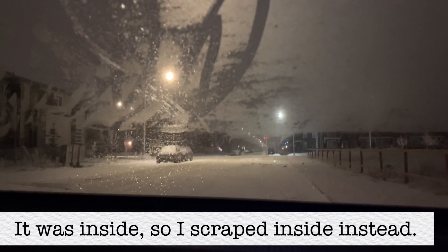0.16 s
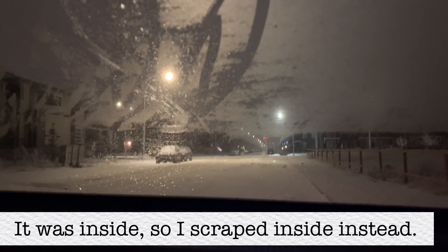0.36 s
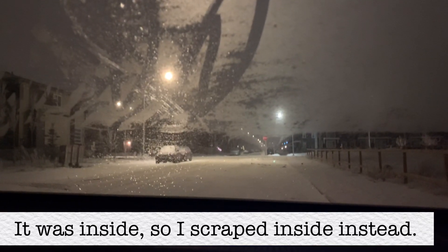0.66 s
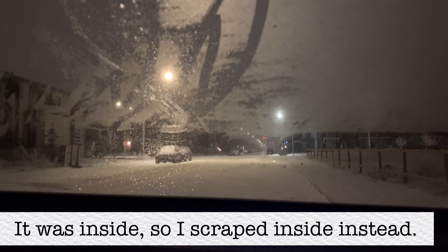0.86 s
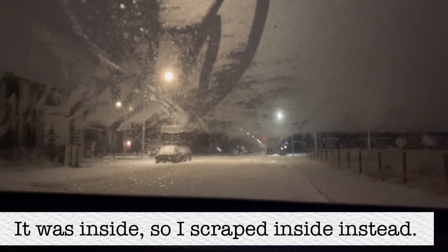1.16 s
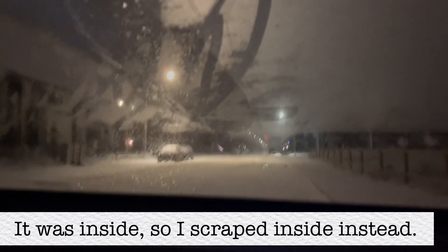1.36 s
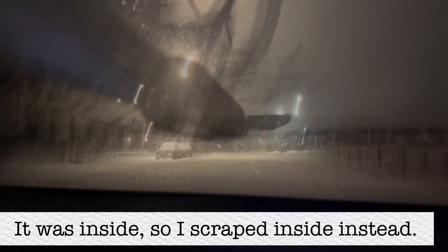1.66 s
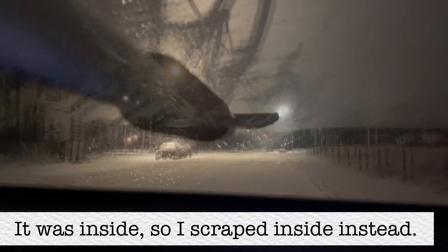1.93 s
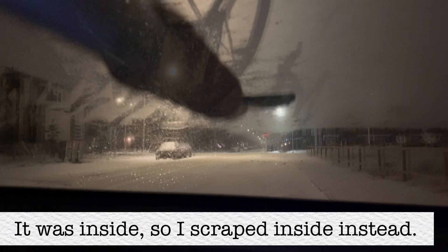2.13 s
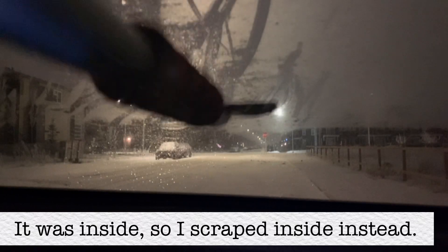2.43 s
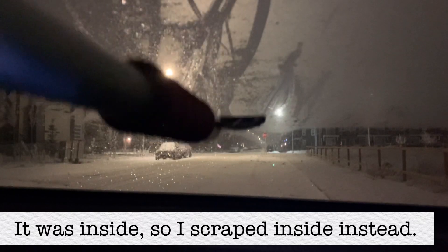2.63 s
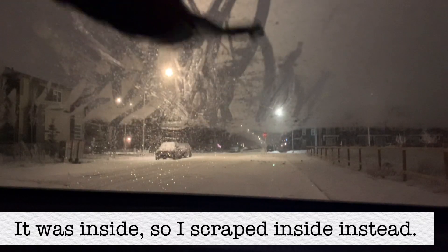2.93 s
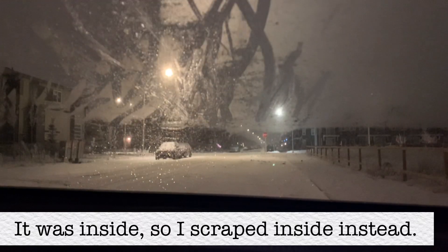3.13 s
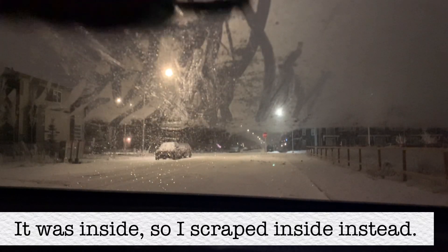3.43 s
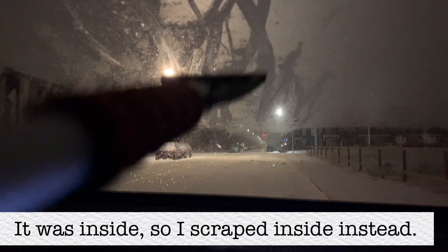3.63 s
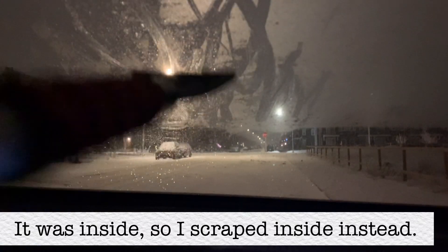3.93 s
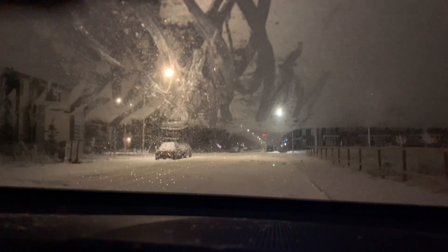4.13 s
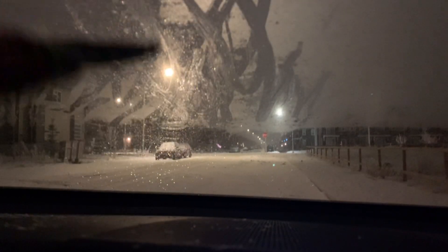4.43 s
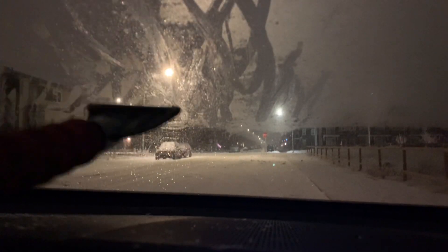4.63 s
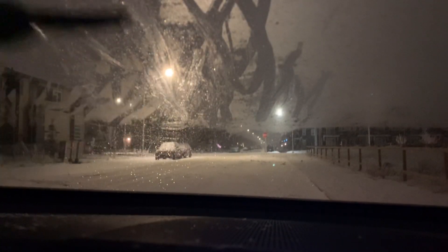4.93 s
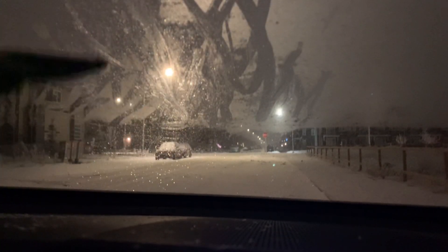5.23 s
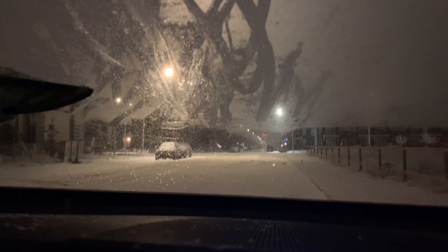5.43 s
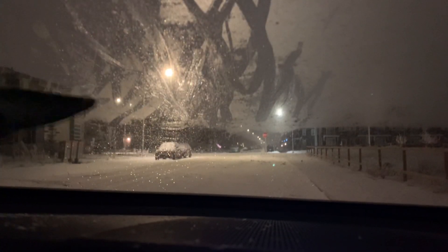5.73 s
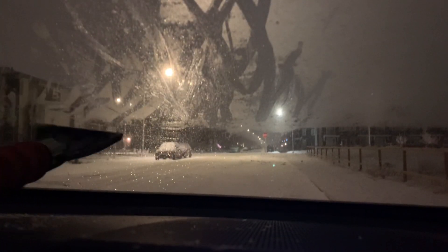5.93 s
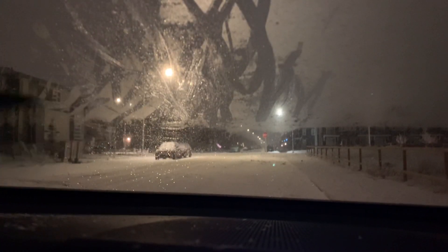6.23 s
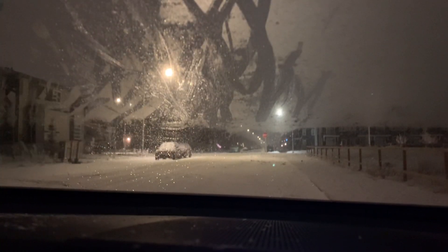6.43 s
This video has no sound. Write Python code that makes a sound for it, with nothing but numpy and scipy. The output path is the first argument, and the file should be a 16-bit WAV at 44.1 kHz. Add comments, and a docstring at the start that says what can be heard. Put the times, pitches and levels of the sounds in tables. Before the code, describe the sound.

Inside a parked car, a heater blower roars low and steady with a faint wavering drone. After about a second, a plastic scraper touches the windscreen, brushing softly, then rasping frost away in crisp, gritty, uneven strokes with brief squeaks. The scraping later thins into shorter, lighter scratches, and the handle knocks the trim once with a hard clack and dull thud. A phone close by picks it up in stereo.

```python
"""A heater blower roars inside a parked car over a low drone: shaped noise and a wavering low tone.
Then a plastic blade rasps frost off the windscreen in uneven strokes: bursting noise rings its resonances.
The edge ticks on the glass in short noise cracks, and once the handle knocks the trim, which cracks, rings and thuds.
A phone with two microphone ports lies near; in the top treble both channels carry mostly one sound."""
import sys
import numpy as np
from scipy import signal
from scipy.fft import rfft, irfft, next_fast_len
from scipy.io import wavfile
from scipy.ndimage import uniform_filter1d, map_coordinates

SR = 44100
rng = np.random.default_rng(int(sys.argv[2]) if len(sys.argv) > 2 else 0)


def master_out(mix):
    """Clip the mix to full scale and print it as 16-bit PCM to the path in sys.argv[1]."""
    frames = np.transpose(np.atleast_2d(mix))
    ceiling = np.clip(frames, -1, 1)
    pcm = np.round(ceiling * 32767).astype(np.int16)
    wavfile.write(sys.argv[1], SR, pcm)


N = 289737  # length in samples
M = next_fast_len(N)  # length of the Fourier transforms
T = np.arange(N) / SR  # time, s
F = np.arange(M // 2 + 1) * SR / M  # frequency, Hz
SIGN = np.array([[1], [-1]])  # left port plus, right port minus

# strokes of the blade, from bite to lift:
# (start [s], end [s], rasp drive at start [dB], at end [dB], blade body relative to rasp [dB])
STROKE_LIST = [ (1.162, 1.45, -49, -69, 7), (1.442, 1.503, -50, -53, 2), (1.522, 1.74, -50, -65, 4),
               (1.773, 1.8, -50, -51.5, 10.5), (1.98, 2.055, -46.5, -45, 3.5),
               (2.078, 2.19, -35.5, -35, -1.5), (2.244, 2.25, -42, -45, 6), (2.27, 2.7, -59, -57, 8),
               (2.39, 2.53, -42.5, -37, 3.5), (2.62, 2.692, -44, -37.5, -3), (2.73, 2.914, -34, -27, -2.5),
               (2.927, 3.015, -30, -30, -1.5), (3.055, 3.22, -25.5, -33.5, -2.5),
               (3.25, 3.275, -45.5, -39, 3), (3.288, 3.354, -32, -34, 0.5), (3.412, 3.46, -31, -31, 0.5),
               (3.517, 3.64, -34.5, -28, -1), (3.617, 3.77, -32.5, -39, 1),
               (3.849, 3.892, -35, -35.5, -1.5), (3.954, 4.017, -31, -31.5, 3),
               (4.067, 4.173, -28, -29.5, -4), (4.275, 4.41, -37.5, -39, 0.5),
               (4.414, 4.485, -27.5, -31.5, -1), (4.524, 4.614, -31, -41, -0.5),
               (4.762, 4.77, -35.5, -36.5, -3), (4.797, 4.808, -38, -37.5, -5), (4.815, 4.845, -49, -51, 0),
               (4.86, 4.96, -36.5, -33.5, -0.5), (5.093, 5.3, -42.5, -57, 4), (5.158, 5.21, -32, -38.5, 1),
               (5.24, 5.306, -27.5, -37, 0), (5.283, 5.447, -40, -40, 3), (5.46, 5.52, -49, -57, 2),
               (5.528, 5.575, -45, -47.5, 3.5), (5.59, 5.64, -55, -59, 6), (5.652, 5.75, -48.5, -47, 3),
               (5.762, 5.8, -38, -37, -3), (5.815, 5.853, -29, -38, -7), (5.868, 5.924, -33, -43, -3.5),
               (5.95, 6.13, -57, -64, 5), (6.086, 6.089, -54, -53, 10), (6.154, 6.222, -41.5, -36, -3.5),
               (6.289, 6.325, -32.5, -46.5, -0.5), (6.33, 6.395, -50, -57, 2), (6.409, 6.412, -39, -47, 3),
               (6.448, 6.63, -46, -37, 0.5)]
# the blade hops off (minus) or bites in (plus): (time [s], level change [dB], half-length [s])
JOLT_LIST = [(3.226, -13, 0.015), (3.389, 16, .006), (3.401, -7, 0.0046), (3.898, -7, 0.005),
             (4.18, -5, 0.0077), (4.2, 7, 0.0049), (4.37, -9, 0.0046), (4.716, 22, .006), (4.785, -4, .005),
             (4.848, -8, .005), (4.912, -12, 0.005), (4.945, -13, 0.0043), (5.203, -2, 0.005),
             (5.317, -4, 0.0047), (5.81, -9.5, .005), (6.266, -17, 0.0086), (6.281, 3, 0.0029),
             (6.458, 7.5, .01), (6.478, -10, .006), (6.5, 8, 0.011)]
# overall tone colour of the rasp: (frequency [Hz], relative level [dB])
RASP_COLOUR = [(1000, -2), (1900, -5), (2600, -1), (3500, -2.5), (4600, -6), (5200, -6), (6300, -7),
               (7500, -9), (10000, -4.5), (13000, -0.5), (16000, -3)]
# resonances of blade and glass, before their levels wander:
# (frequency [Hz], width [Hz], level over rasp [dB])
BLADE_RINGS = [(2356, 41, 1.5), (2610, 42, -1), (3080, 72, -5), (3400, 120, -9.5), (3940, 190, -1.5),
               (4460, 160, 1.5), (4880, 120, -3), (5760, 120, -19), (7300, 370, -4), (8080, 120, 4.5),
               (9670, 440, 0), (10450, 350, -2), (11370, 280, -6.5), (12200, 230, -21), (13800, 320, -22)]
# moments when a resonance sings out: (time [s], frequency [Hz], gain on the rasp drive [dB], half-length [s])
SING_LIST = [(2.12, 3830, 8, 0.041), (2.822, 3420, 11, .045), (2.856, 2550, 9, .035),
             (2.87, 3000, 3, 0.027), (2.857, 5000, 6, 0.033), (2.97, 3020, 9.5, 0.042),
             (2.975, 3700, 7, 0.03), (3.01, 2330, 11, 0.016), (3.028, 3650, 17, 0.0086),
             (3.06, 3950, 6, 0.022), (3.07, 3470, 7, .022), (3.074, 9850, 15, 0.041),
             (3.114, 2940, 10, 0.027), (3.114, 5130, 10, 0.016), (3.145, 3400, 11, 0.019),
             (3.303, 3380, 10, 0.016), (3.323, 3040, 6, .03), (3.32, 9650, 9, 0.034), (3.39, 4060, 13, .01),
             (3.437, 4120, 9, .032), (3.44, 2370, 9, 0.04), (3.444, 3040, 9, .035),
             (3.524, 2400, 10, 0.027), (3.566, 3060, 12, 0.031), (3.626, 4570, 6, 0.067),
             (3.98, 2380, -1, 0.032), (4.085, 3240, 11.5, 0.024), (4.138, 4000, 11, 0.025),
             (4.15, 3400, 11, .03), (4.42, 3230, 8, 0.019), (4.454, 4400, 5, 0.026),
             (4.446, 2390, 2, 0.027), (4.457, 3680, 10, 0.02), (4.564, 5800, 3, 0.014),
             (4.768, 3700, 9, .006), (4.875, 4100, 8, .012), (4.882, 3230, 13, .012),
             (4.928, 4500, 15, .012), (4.95, 4370, 13, 0.0076), (4.936, 2550, -4, 0.017),
             (5.1, 4370, 15, .008), (5.16, 3950, 5, 0.0073), (5.165, 4700, 10, 0.011),
             (5.23, 4500, 6, 0.016), (5.25, 2540, 7, 0.038), (5.257, 4100, 5, .015), (5.268, 4490, 8, .01),
             (5.277, 3200, 10, 0.023)]
# broad bands of the dry tick: (from [Hz], to [Hz])
TICK_BANDS = [(3000, 4800), (5000, 7400), (9400, 12800), (14300, 15600)]
# blade edge ticking on glass; near 5.83 s, the hard cracks of the knock; before the ports are mixed:
# (time [s], then the peak in each tick band, low to high [dB])
TICK_LIST = [(1.097, -36, -37, -37, -40), (1.4255, -38, -38, -32, -35), (1.4408, -20, -22, -29, -34),
             (1.4425, -23, -33, -35, -38), (1.5036, -24, -24, -24, -17), (2.2377, -32, -37, -37, -37),
             (6.2795, -33, -38, -32, -40), (5.8232, -21, -34, -27, -36), (5.8275, -27, -28, -18, -34),
             (5.829, -23, -23, -24, -34), (5.8315, -25, -24, -23, -31)]
# blows of the handle on the trim, with a bounce: (time [s], strength [dB], left minus right [dB])
KNOCK_LIST = [(5.8232, -25, 5), (5.8255, -24, 4), (5.8277, -18.5, 2), (5.8312, -27, 4), (5.8335, -27, 2),
              (5.839, -34, 0)]
# ringing of the trim: (frequency [Hz], typical level [dB], time to fall 60 dB [s], left phase lead [turns])
TRIM_RINGS = [(414, -3, .032, .2), (662, 4, .03, .12), (776, 2, .03, .15), (890, -5, .026, .35),
              (1130, -2, .015, .45), (1250, 0, .022, .45), (1410, -4, .022, .3), (1730, 2.5, .02, .15),
              (1970, -5, .016, .25), (2300, -4, .016, .45), (2620, -7, .016, .4), (3280, -9, .018, .2),
              (4640, -11, .012, .15)]
# low thumps around the knock: (time [s], frequency [Hz], peak [dB], half-length [s])
THUD_LIST = [(5.811, 86, -22, 0.015), (5.838, 409, -28, 0.011), (5.841, 199.2, -16.5, 0.0081),
             (5.855, 94, -19.5, 0.021)]
# loudness of the roar before it wavers: (time [s], level [dB])
ROAR_LEVEL = [(0, -27.5), (1.07, -27.5), (1.12, -24), (2.55, -25), (2.68, -27), (4.45, -28), (4.9, -27),
              (5.5, -27.5), (6.57, -27.5)]
# tone colour of the blower air: (frequency [Hz], relative level per Hz [dB])
BLOWER_COLOUR = [(20, -29), (39, -10), (87, -1.5), (129, -7.5), (157, -10), (191, -4), (226, -7.5),
                 (296, -7.5), (428, -12), (790, -15), (961, -22), (1230, -25), (2060, -31.5), (2900, -33),
                 (3300, -36.5), (3950, -37), (4250, -43.5), (5000, -43), (5700, -47), (6350, -45),
                 (7100, -50.5), (8000, -52), (10800, -56), (12000, -51.5), (16000, -62)]
# cabin and duct resonances in the roar: (frequency [Hz], width [Hz], boost [dB])
CABIN_RESONANCES = [(82, 13, 0.5), (116.6, 18, 3), (198, 12, 0.5), (280, 19, 3), (870, 180, 0.5),
                    (1344, 320, 6), (1800, 37, -3.5)]
# how alike the roar is at the two ports: (frequency [Hz], likeness [-1 to 1])
PORT_LIKENESS = [(30, 0.21), (60, 0.92), (290, 0.85), (640, 0.57), (1400, 0.16), (2200, -0.14),
                 (3500, 0.043)]
# balance of the roar: (frequency [Hz], left minus right [dB])
PORT_BALANCE = [(60, -2), (130, -1), (380, 1.5), (1300, 0.2), (2400, 2), (5500, -3), (8000, -5.5)]
# low cabin drone near 57 Hz, swelling and fading, before its level wavers: (time [s], level [dB])
DRONE_LEVEL = [(0.0, -42.5), (0.88, -35), (1.1, -44), (1.22, -25), (1.37, -41), (1.52, -28.5), (1.9, -43),
               (2.12, -27.5), (2.4, -43), (2.49, -26), (2.96, -54), (3.16, -36), (3.3, -46), (4.1, -44),
               (4.24, -30), (4.37, -54.5), (4.46, -39), (6.57, -38.5)]

BITE_DB_PER_S, LIFT_DB_PER_S = 746, 517  # how fast the rasp comes in and dies away
DULLER_PER_DB = 0.1742  # body gained over rasp, in dB, for each dB that the blade eases off
REST_FROM_S, REST_DB, REST_BODY_DB = 1.1, -66, -4  # faint brushing between strokes
BODY_TOP_HZ = 6340  # the body level matters less and less above this
SING_WIDTH_HZ, SING_ALIKE = 81, 0.24  # alike: shared part of the singing at the two ports, 0 to 1
SQUEAKS_PER_S, SQUEAK_DB, SQUEAK_SPREAD_DB, SQUEAK_S = 200, -4, 0.5, 0.012  # chance catches
SNAP_S, ANSWER_S = .0009, .004  # fade times of a tick and its answer
ANSWER_DB, FIRST_DB = -14, 14  # answer and first click, before scaling in each band
CABIN_T60_S, CABIN_DB = .045, -5  # echoes of the knock: time to fall 60 dB, level
SURGE_DB = 1.16  # each octave of the roar surges on its own
DRONE_HZ = 57.36  # middle pitch of the drone
ONE_SOUND_HZ, LEFT_LATE_S, LEFT_TURN = 7300, .000204, .25  # crossover, lag, fixed phase lead in turns
TOP_HZ = 15700  # end of the treble


def undb(db):
    """Turn decibels into gain."""
    return 10 ** (np.asarray(db) / 20)


def unit(x):
    """Scale to an rms of 1."""
    return x / np.sqrt(np.mean(x ** 2))


def over_hz(table):
    """Read a (Hz, value) table on a log-frequency axis."""
    hz, value = np.transpose(table)
    return np.interp(np.log(F + 1), np.log(hz), value)


def walk(rate):
    """Wander smoothly: random levels held for 1 / rate s, then smoothed twice; spread near 1."""
    k = int(SR / rate)
    steps = np.repeat(rng.standard_normal(N // k + 1), k)
    return 1.223 * uniform_filter1d(uniform_filter1d(steps, k), k)[:N]


def scraping():
    """Ice crystals of unequal size burst densely, in catches and slips, and drive the blade."""
    rasp_db, body_db = pressure()
    # each crystal size is held for 8 samples
    size = np.repeat(rng.exponential(size=(2, N // 8 + 1)), 8, axis=1)[:, :N]
    crystals = rng.standard_normal((2, N)) * undb(2.2 * size)
    drive = unit(crystals) * undb(rasp_db + 0.6 * walk(60) + 1.5 * walk(300))
    left, other = sung(drive)
    right = np.sqrt(SING_ALIKE) * left + np.sqrt(1 - SING_ALIKE) * other
    return travel(blade(drive, body_db)) + np.array([left, right])


def pressure():
    """Each stroke bites, slides from its first level to its last and lifts; the strongest one is heard."""
    rasp_db = np.where(T > REST_FROM_S, REST_DB, -90.)
    body_db = np.full(N, 1. * REST_BODY_DB)
    for start, end, start_db, end_db, stroke_body_db in STROKE_LIST:
        eased_db = BITE_DB_PER_S * np.maximum(start - T, 0) + LIFT_DB_PER_S * np.maximum(T - end, 0)
        db = np.interp(T, [start, end], [start_db, end_db]) - eased_db
        body_db = np.where(db > rasp_db, stroke_body_db + DULLER_PER_DB * eased_db, body_db)
        rasp_db = np.maximum(rasp_db, db)
    jolt_db = sum(db * np.exp(-((T - at) / length) ** 2) for at, db, length in JOLT_LIST)
    return rasp_db + jolt_db, uniform_filter1d(body_db, size=400)


def blade(drive, body_db):
    """Frost drives the blade; broad regions and narrow resonances wander in level as angle and pressure shift."""
    colour = undb(over_hz(RASP_COLOUR))
    sound = rfft(drive, M) * colour / np.sqrt(np.mean(colour ** 2))
    parts = []
    for hz in 1000 * 2 ** np.arange(0, 4.5, .5):  # half-octave steps
        region = np.clip(1 - 2 * abs(np.log2((F + 1) / hz)), 0, 1)
        parts.append((hz, region, 0.6 * walk(25)))
    for hz, width, db in BLADE_RINGS:
        ring = 1 / (1 + (2 * (F - hz) / width) ** 2)
        parts.append((hz, ring, db + 1.5 * np.tanh(walk(15))))
    out = 0
    for hz, shape, db in parts:
        tilt_db = body_db / (1 + (hz / BODY_TOP_HZ) ** 6)
        out = out + undb(db + tilt_db) * irfft(sound * shape, M)[:, :N]
    return out


def sung(drive):
    """The frost drive rings narrow resonances for a moment: the listed ones, and many short ones by chance."""
    at, pitch, size, span = rng.random((int(SQUEAKS_PER_S * N / SR), 4)).T
    squeak_hz = 2500 * 2.8 ** pitch  # 2.5 to 7 kHz
    squeak_db = SQUEAK_DB - SQUEAK_SPREAD_DB * np.log(size + .05)
    chance = zip(at * T[-1], squeak_hz, squeak_db, SQUEAK_S * (.5 + span))
    out = np.zeros((2, N))
    for s, hz, db, length in SING_LIST + list(chance):
        now = slice(max(int((s - 2 * length) * SR), 0), int((s + 2 * length) * SR))
        peak = signal.iirpeak(hz, hz / SING_WIDTH_HZ, fs=SR)
        swell = np.exp(-((T[now] - s) / length) ** 4)
        out[:, now] += undb(db) * swell * signal.lfilter(*peak, drive[:, now])
    return out


def travel(pair, shared=0.43, reach_s=0.000504, lean_db=0.2):
    """Part of the right port's sound is the left's, early or late as the blade moves across the glass."""
    moved = map_coordinates(pair[0], [(T + reach_s * walk(3)) * SR], order=3)
    right = np.sqrt(shared) * moved + np.sqrt(1 - shared) * pair[1]
    return undb(SIGN * lean_db / 2) * np.array([pair[0], right])


def ticks():
    """Dry single cracks of the edge or the knock: a sharp snap, then glass and cabin answer briefly."""
    out, t = np.zeros((2, N)), T[:SR // 40]
    for s, *band_db in TICK_LIST:
        fade = np.exp(-t / SNAP_S) + undb(ANSWER_DB) * np.exp(-t / ANSWER_S)
        crack = rng.standard_normal((2, len(t))) * fade
        crack[:, 0] = undb(FIRST_DB)  # the first contact is one clean click
        for band, db in zip(TICK_BANDS, band_db):
            bandpass = signal.butter(2, band, "bandpass", fs=SR, output="sos")
            part = signal.sosfilt(bandpass, crack)
            part /= np.abs(part).max(axis=1, keepdims=True)
            out[:, int(s * SR):int(s * SR) + len(t)] += undb(db) * part
    return out


def knock():
    """Each blow rings the trim with its own strengths and signs, over a dull rattle."""
    out, t = np.zeros((2, N)), T[:SR // 4]
    for s, db, pan_db in KNOCK_LIST:
        dull = signal.lfilter(*signal.butter(1, 1300, fs=SR), rng.standard_normal((2, len(t))))
        blow = undb(9) * dull * np.exp(-t / 0.004)
        for hz, ring_db, t60, turns in TRIM_RINGS:
            ring = np.sin(2 * np.pi * (hz * t + SIGN * turns / 2)) * 10 ** (-3 * t / t60)
            strength = undb(ring_db + 1.3 * rng.standard_normal((2, 1)))
            blow = blow + rng.choice([-1, 1]) * strength * ring
        out[:, int(s * SR):int(s * SR) + len(t)] += undb(db + SIGN * pan_db / 2) * blow
    return echoes(out)


def echoes(x):
    """Short dense reflections off glass and seats, different at each port: fading noise."""
    t = T[:SR // 5]
    tail = rng.standard_normal((2, len(t))) * 10 ** (-3 * t / CABIN_T60_S) * (t > .001)
    tail /= np.sqrt(np.sum(tail ** 2, axis=1, keepdims=True))  # equal energy at each port
    return x + undb(CABIN_DB) * signal.fftconvolve(x, tail, axes=1)[:, :N]


def thud():
    """Soft low tones swell and fade, alike at both ports."""
    out = np.zeros(N)
    for s, hz, db, length in THUD_LIST:
        out += undb(db) * np.exp(-((T - s) / length) ** 2) * np.sin(2 * np.pi * hz * T)
    return out


def cabin():
    """Blower air and the low drone together form the background."""
    return blower() + cabin_drone()


def blower():
    """Turbulent air is random noise, coloured by duct and cabin and surging octave by octave."""
    db = over_hz(BLOWER_COLOUR) + bumps(CABIN_RESONANCES)
    alike = np.clip(over_hz(PORT_LIKENESS), -1, 1)
    mid, side = rfft(rng.standard_normal((2, M)))
    ports = mid * np.sqrt(1 + alike) + SIGN * side * np.sqrt(1 - alike)
    spectrum = undb(db + SIGN * over_hz(PORT_BALANCE) / 2) * ports
    air = 0
    for hz in 16 * 2 ** np.arange(12):
        octave = np.clip(1 - abs(np.log2((F + 1) / hz)), 0, 1)
        air = air + undb(SURGE_DB * walk(7)) * irfft(spectrum * octave, M)[:, :N]
    return unit(air) * undb(np.interp(T, *np.transpose(ROAR_LEVEL)) + 0.71 * walk(6))


def bumps(modes):
    """Resonance peaks in dB over frequency."""
    return sum(db / (1 + (2 * (F - hz) / width) ** 2) for hz, width, db in modes)


def cabin_drone():
    """One low tone wavers in pitch and level, a little stronger at the right port."""
    drone = np.sin(2 * np.pi * np.cumsum(DRONE_HZ + 2.0 * walk(8)) / SR)
    drone = unit(drone) * undb(np.interp(T, *np.transpose(DRONE_LEVEL)) + 1.7 * walk(5.97))
    return drone * undb(-0.8 * SIGN)


def scene():
    """All sources add up at the two ports."""
    return scraping() + travel(ticks()) + knock() + thud() + cabin()


def record(dry):
    """Above the crossover the left mostly repeats the right a little late; the top is cut."""
    left, right = rfft(dry, M)
    share = .93 / (1 + (ONE_SOUND_HZ / (F + 1)) ** 16)
    late = right * np.exp(-2j * np.pi * (F * LEFT_LATE_S - LEFT_TURN))
    left = np.sqrt(1 - share) * left + np.sqrt(share) * late
    both = irfft([left, right], M)[:, :N]
    return signal.sosfilt(signal.ellip(12, .2, 70, TOP_HZ, fs=SR, output="sos"), both)


dry = scene()
out = record(dry)
master_out(out)
```